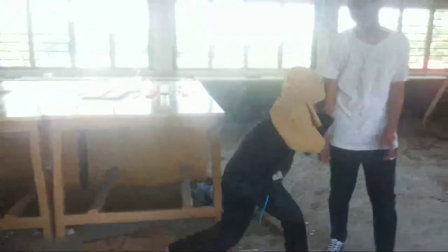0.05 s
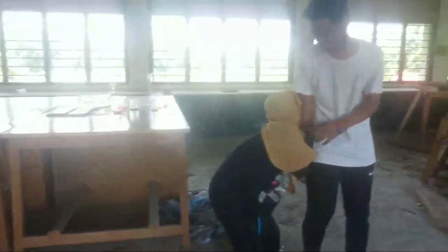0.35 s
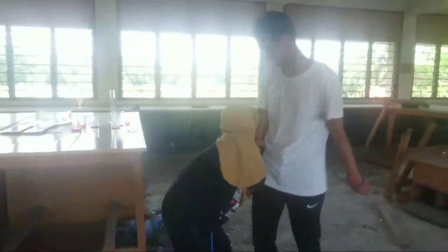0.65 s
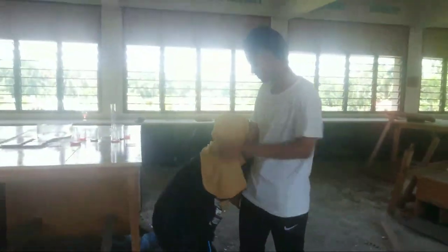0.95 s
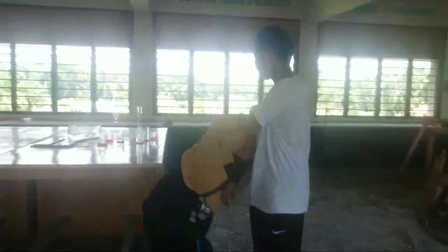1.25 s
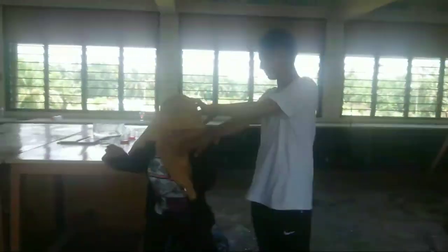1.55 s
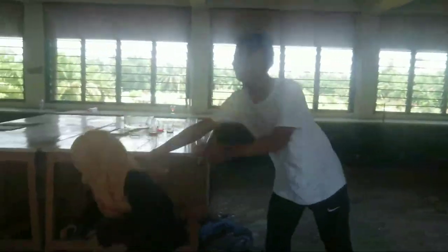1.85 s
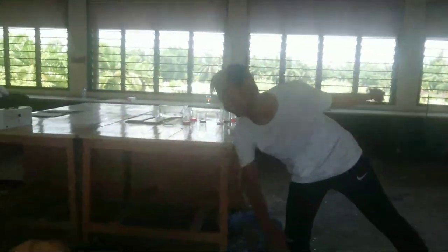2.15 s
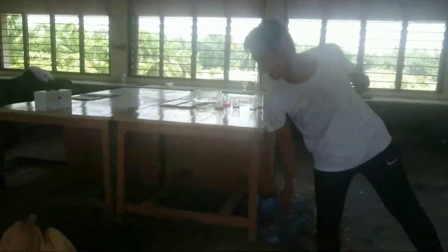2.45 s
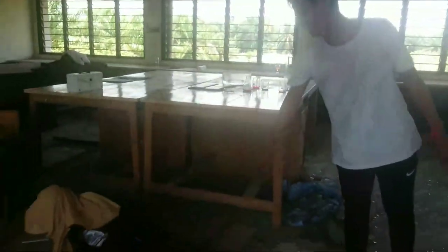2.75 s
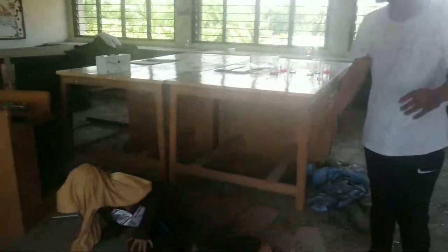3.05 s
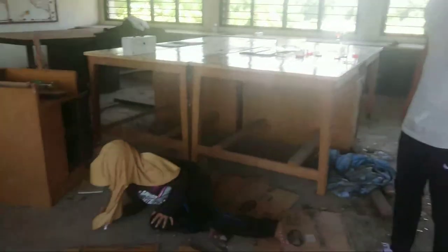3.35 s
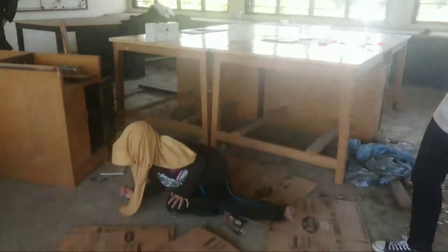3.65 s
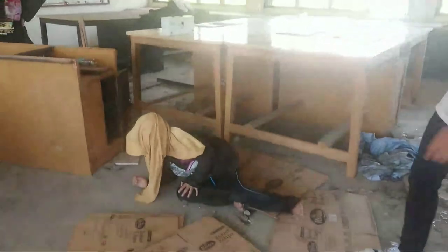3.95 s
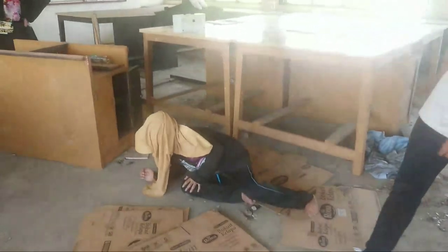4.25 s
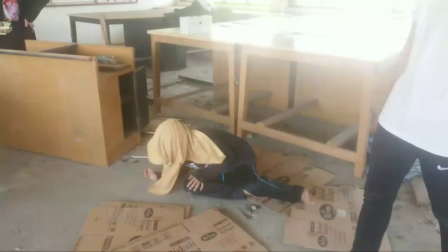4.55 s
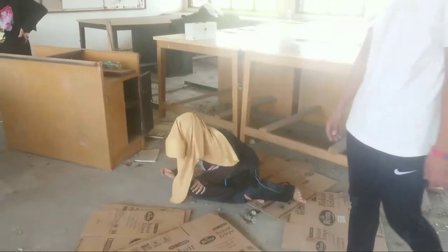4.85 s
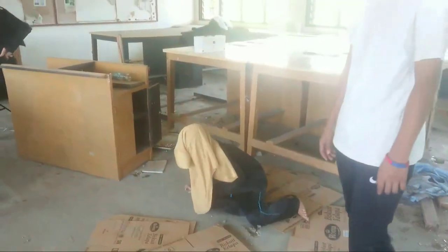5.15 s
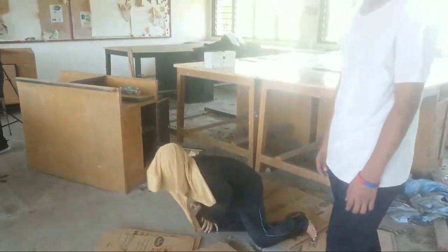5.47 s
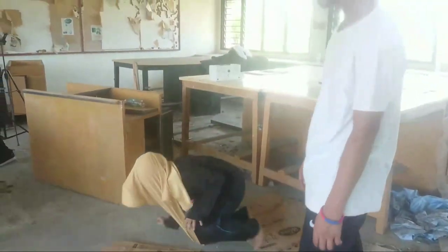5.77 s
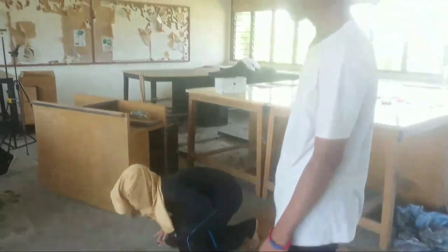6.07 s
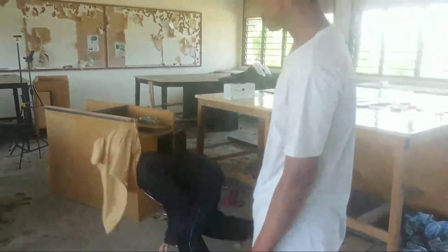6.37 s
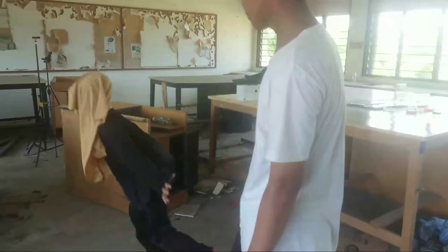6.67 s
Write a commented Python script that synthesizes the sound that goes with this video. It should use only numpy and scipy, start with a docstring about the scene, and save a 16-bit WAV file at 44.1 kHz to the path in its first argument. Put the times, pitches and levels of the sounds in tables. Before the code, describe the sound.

Irregular scuffing, cardboard crackles and dull thumps of two people scuffling on a hard floor, ringing in a bare room.

```python
"""Two people scuffle in a bare classroom, on gritty concrete covered with flattened cardboard boxes.
From the start, over a low rumble, soles and clothes drag; the cardboard snaps and knocks.
Feet and knees thump down, hardest at 2.2 s. A sliding contact squeaks at 2.6-3 s; more landings follow.
A lull from 3.5 s is broken by a scrape at 4.3 s; scuffing builds again to landings at 6.1 and 6.8 s.
The hard room rings on after every move."""
import sys
import numpy as np
from scipy import signal
from scipy.fft import rfft, irfft, next_fast_len
from scipy.io import wavfile
from scipy.ndimage import uniform_filter1d, map_coordinates

SR = 44100
rng = np.random.default_rng(int(sys.argv[2]) if len(sys.argv) > 2 else 0)


def persist_wave(psi):
    """Save psi, clipped to +-1, as 16-bit WAV."""
    counts = np.round(np.clip(psi, -1, 1) * 32767).astype(np.int16)
    wavfile.write(sys.argv[1], SR, np.atleast_2d(counts).T)


N = 300321

# Levels are relative, ahead of each layer's gain.
# sole and cloth strokes: t/s, length/s, scrape/dB, grit/dB, share on cardboard (clipped to 0-1)
STROKES = [(-0.02, 0.09, -31, -33, .5), (0.106, 0.083, -38.5, -36, 0.5), (0.22, .04, -42, -33, -3),
           (0.318, 0.068, -29, -19.5, -0.16), (0.423, 0.036, -28.5, -21, 1.7),
           (0.446, 0.01, -19, -22.5, -0.1), (0.57, .14, -41, -47.5, -1.9), (0.81, 0.082, -45, -43.5, 0.1),
           (0.968, 0.051, -30.5, -30.5, 0), (1.211, 0.016, -24.5, -31, 0.36),
           (1.263, 0.068, -40, -33.5, 0.7), (1.502, 0.051, -23, -23.5, .1), (1.539, 0.017, -17, -21.5, 0),
           (1.58, .09, -39, -40, 2.5), (1.666, 0.037, -23, -23, 0.3), (1.839, 0.14, -30.5, -29.5, 0.2),
           (2.015, 0.041, -25, -21.5, 0.4), (2.124, 0.051, -29, -26, 0.4), (2.19, 0.17, -34, -30.5, -0.1),
           (2.374, 0.12, -25.5, -29, 0.16), (2.494, .11, -26.5, -31.5, 0.4), (2.635, 0.28, -46.5, -38.5, 0),
           (2.903, 0.22, -44, -38.5, 0.4), (3.266, 0.02, -31.5, -33.5, -0.6), (4.01, 0.11, -59, -57, 20),
           (4.113, .11, -44.5, -39, -1), (4.27, 0.13, -26, -26, -0.32), (4.35, 0.095, -30.5, -36, 0.2),
           (4.595, .22, -62, -46.5, 0.5), (4.907, 0.17, -57.5, -45, .1), (5.188, 0.16, -55, -46, 0.7),
           (5.381, 0.04, -40.5, -45.5, 0.4), (5.595, 0.31, -46.5, -47, 0.8), (5.788, 0.2, -38.5, -39, 0.38),
           (6.047, 0.059, -32, -30.5, 0.5), (6.255, 0.21, -37, -34, 0.9),
           (6.402, 0.091, -29.5, -33.5, 0.13), (6.497, 0.19, -36.5, -38.5, 0.3),
           (6.713, 0.062, -32, -30, 1.8)]
# weight rolling over the sheets: t/s, length/s, drone/dB
ROLLS = [(-0.03, 0.11, -39), (1.603, 0.17, -39.5), (2.021, 0.047, -33), (4.325, .12, -45),
         (5.775, 0.32, -48.5), (6.392, 0.29, -43)]
# spectra of concrete rasp, hollow cardboard, grit hiss, sheet drone: f/Hz, level/dB
RASP_SPECTRUM = [(240, -24), (450, -22.5), (700, -16), (950, -5.5), (1200, -2.5), (1550, -4.5),
                 (2150, -0.5), (2600, -4), (3400, -5.5), (8000, -2.5), (12000, -50.5)]
SHEET_SPECTRUM = [(300, -18), (600, -19.5), (710, 1.5), (780, -9), (855, 2.5), (950, -15), (1055, -1.5),
                  (1140, -20), (1240, -9), (1500, -11), (4000, -31.5)]
GRIT_SPECTRUM = [(1200, -22), (2200, 14), (3300, 0.5), (5200, -0.5), (6100, -2.5), (7300, -1), (10300, -8),
                 (13000, -10.5), (15800, -15.5)]
DRONE_SPECTRUM = [(70, -17), (125, -1.5), (180, -14.5), (236, 9.5), (310, -9.5), (410, 4.5), (540, 1),
                  (680, -5.5), (1100, -36)]
# background spectra: f/Hz, level/dB
RUMBLE_SPECTRUM = [(35, -15), (52, 6), (85, 5), (130, -4.5), (220, -13.5), (500, -29)]
AIR_SPECTRUM = [(100, -4), (400, 15), (1500, -13), (6000, -22), (11000, -9), (14000, -26)]
# rumble envelope: t/s, level/dB
RUMBLE_LEVEL = [(0.0, -42.5), (0.42, -47.5), (1.61, -50.5), (2.39, -49), (3.02, -55), (3.47, -57),
                (4.14, -58.5), (6.07, -52.5), (6.81, -58)]
# cardboard and grit snapping: t/s, level/dB, body offset/dB, f/Hz
SNAPS = [(0.0864, -16, -13, 4930), (0.1638, -11.5, -20, 5050), (0.3184, -12.5, -17, 5400),
         (0.3471, -5, -31, 5540), (0.455, -4, -32, 5040), (0.465, -21, -20, 5000), (1.227, -13, -18, 2280),
         (1.3022, -24, -11, 2380), (1.4702, -29.5, 2.5, 2420), (1.525, -12, 0.5, 2100),
         (1.534, -17, 5, 2180), (2.0318, -8.5, -28, 6960), (2.0452, -13.5, -14, 3130),
         (3.2715, -23.5, -1.5, 4200), (3.2964, -18.5, -4, 2200), (3.312, -27.5, -3, 2270),
         (3.485, -32.5, -42, 5970), (4.159, -23.5, -19, 2240), (4.2693, -29, 6, 2280),
         (4.3295, -15.5, 1.5, 2280), (5.3193, -37, 2.5, 2080), (5.3868, -35, -15, 2360),
         (5.589, -37.5, -15, 2640), (6.059, -12.5, -18, 6900), (6.0905, -22.5, -16, 2450),
         (6.7337, -15, -11, 6270)]
# knocks on a buckled sheet: t/s, level/dB, f/Hz
KNOCKS = [(0.2084, -14.5, 864), (0.898, -32, 810), (1.217, -26, 1130), (1.226, -23, 973),
          (1.562, -11, 1060), (3.271, -27, 930), (5.3865, -34, 2210)]
# feet, hands and knees landing: t/s, level/dB, thud offset/dB, slap f/Hz, thud f/Hz
LANDINGS = [(0.458, -27, -12, 690, 204), (1.227, -28, -8, 1020, 240), (1.655, -31.5, 0.5, 550, 161),
            (2.164, -14.5, -4, 1050, 393), (2.254, -23.5, -2.5, 720, 470), (2.282, -25, -0.5, 650, 230),
            (3.294, -26, 1, 1040, 426), (3.31, -28.5, -0.5, 1120, 486), (3.342, -39, 4.5, 850, 437),
            (5.387, -39.5, -3.5, 880, 354), (6.091, -20.5, -8.5, 745, 247), (6.759, -16.5, -7.5, 800, 272),
            (6.777, -27, -12, 930, 240)]
# impact spectra: multiple of the event's f, level/dB
CRACK_SPECTRUM = [(.15, -15), (.6, -13), (1, 7.5), (1.4, -1), (2.5, -2), (6, -38)]
SLAP_SPECTRUM = [(.2, -17), (.55, -19.5), (1, 5.5), (1.35, -5.5), (1.9, -13), (3.2, -13), (9, -35.5),
                 (17, -33)]
THUD_SPECTRUM = [(.12, 8), (.3, -16), (.65, 0.5), (1.2, 5), (1.8, 0.5), (3.5, -24), (12, -48)]
# stick-slip squeaks and groans: centre t/s, length/s, f/Hz, waver/Hz, level/dB
SQUEAKS = [(2.58, .09, 7480, 32, -41), (2.58, .14, 858, 22, -41), (2.674, .047, 6990, 22, -36),
           (2.72, .22, 7480, 24, -50), (2.73, .12, 6990, 20, -43), (2.94, .05, 7000, 40, -46),
           (4.44, .24, 700, 16, -47), (5.738, .06, 309, 12, -53)]
# mover's bearing: t/s, left channel lead/s
BEARING = [(0, .00003), (1.2, .00011), (2.2, .00009), (3.2, 0), (4.3, -.00008), (5.2, .00004),
           (6.8, .00007)]
# room decay: f/Hz, t60/s
ROOM_T60 = [(100, 3.2), (400, 1.1), (1000, 1.04), (2500, 0.88), (6000, 0.73), (14000, 0.48)]
# diffuse field: f/Hz, left-right correlation
COHERENCE = [(100, 1), (300, 0.96), (600, 0.73), (1200, 0.057), (2500, 0), (12000, 0.16)]
# channel balance: f/Hz, left minus right/dB
BALANCE = [(60, 7), (110, 9.5), (200, 6.5), (380, 10.5), (700, 4.5), (1290, 4.5), (2380, 2.0), (4400, 1.0),
           (8120, 5), (15000, 2)]


def amp(db):
    return 10 ** (np.asarray(db) / 20)


def unit(x):
    return x / np.sqrt(np.mean(x ** 2) + 1e-20)


def along(points, hz):
    """Interpolate (f/Hz, value) points on a log axis."""
    f, values = np.transpose(points)
    return np.interp(np.log(hz + 1), np.log(f + 1), values)


def curve(points):
    """Interpolate (t/s, value) points per sample."""
    times, values = np.transpose(points)
    return np.interp(np.arange(N) / SR, times, values)


def wobble(rate_hz):
    """Smooth random curve."""
    knots = rng.standard_normal(int(N * rate_hz / SR) + 4)
    return map_coordinates(knots, [np.arange(N) * rate_hz / SR])


def filtered(x, response):
    """Zero-phase filter, gain response(hz)."""
    n = x.shape[-1]
    size = next_fast_len(n + SR // 4)
    return irfft(rfft(x, size) * response(np.fft.rfftfreq(size, 1 / SR)), size)[..., :n]


def coloured(x, spectrum, scale=1, size=4096):
    """Minimum-phase filter of unit energy; scale multiplies the spectrum's frequencies."""
    gain = amp(along(np.multiply(spectrum, [scale, 1]), np.fft.rfftfreq(size, 1 / SR)))
    cepstrum = irfft(np.log(gain))
    cepstrum[1:size // 2] *= 2
    cepstrum[size // 2 + 1:] = 0
    impulse = irfft(np.exp(rfft(cepstrum)))
    return signal.fftconvolve(x, impulse / np.linalg.norm(impulse))[:len(x)]


def add(track, start_s, sound):
    start = max(round(start_s * SR), 0)
    track[start:start + len(sound)] += sound[:max(N - start, 0)]


def diffuse(pair):
    """Two unrelated signals as a field: alike in the bass, nearly unrelated in the treble."""
    angle = lambda hz: np.arccos(np.clip(along(COHERENCE, hz), -1, 1)) / 2
    mid, side = filtered(pair, lambda hz: np.array([np.cos(angle(hz)), np.sin(angle(hz))]))
    return np.array([mid + side, mid - side])


def stroke(start_s, length_s, sag_db=4.5, release_db_per_s=332):
    """Power of one sliding contact: it bites, eases as it travels, lifts."""
    t = np.arange(N) / SR - start_s
    rise_s = 0.038 * (length_s / 0.13) ** 0.53  # longer strokes build more slowly
    bite = np.clip(t / rise_s, 0, 1)
    eased_db = sag_db * np.clip(t / length_s, 0, 1)
    lifted_db = release_db_per_s * np.maximum(t - length_s, 0)
    return (bite * amp(-eased_db - lifted_db)) ** 2


def sliding(cloth_db=-60, cloth_hiss_db=-66.5):
    """Concrete, cardboard and grit envelopes: strokes over the constant rub of clothes."""
    power = np.outer([amp(cloth_db) ** 2, 0, amp(cloth_hiss_db) ** 2], np.ones(N))
    for start_s, length_s, scrape_db, grit_db, share in STROKES:
        on_sheet = np.clip(share, 0, 1)
        mix = [amp(scrape_db) ** 2 * (1 - on_sheet), amp(scrape_db) ** 2 * on_sheet, amp(grit_db) ** 2]
        power += np.outer(mix, stroke(start_s, length_s))
    return np.sqrt(power)


def slips(rate_hz, spread_db, clump_db, clump_hz):
    """Tiny uneven slips, bunched where the surface catches."""
    hits = rng.random(N) < rate_hz / SR
    sizes = amp(spread_db * rng.standard_normal(N) + clump_db * wobble(clump_hz))
    return unit(hits * sizes * rng.standard_normal(N))


def shifting(x, depth_db=1.8, size=1024):
    """Surface resonances shift as the contact travels."""
    spectra = signal.stft(x, nperseg=size)[2]
    drift = uniform_filter1d(rng.standard_normal(spectra.shape), size=2, axis=0)
    drift = uniform_filter1d(drift, size=12, axis=1)
    return unit(signal.istft(spectra * amp(depth_db * unit(drift)), nperseg=size)[1][:N])


def flexing(scrape_envelope, stir_db=-29.5, shudder_db=-21.5, decay_db_per_s=52.5):
    """Sheet drone envelope: stirred by strokes, pressed by rolling weight, shaken by landings."""
    t = np.arange(N) / SR
    stirred = (amp(stir_db) * scrape_envelope) ** 2
    rolled = sum(amp(db) ** 2 * stroke(start_s, length_s) for start_s, length_s, db in ROLLS)
    shaken = sum((t > start_s) * amp(db + shudder_db - decay_db_per_s * np.abs(t - start_s)) ** 2
                 for start_s, db, *_ in LANDINGS)
    return np.sqrt(stirred + rolled + shaken)


def scuffs(drone_db=-2, split_hz=3600):
    """Soles rasp on concrete, rub hollow on cardboard; grit and cloth hiss above, sheets drone below."""
    on_concrete, on_sheet, on_grit = sliding()
    low = lambda hz: 1 / np.sqrt(1 + (hz / split_hz) ** 8)
    high = lambda hz: np.sqrt(1 - low(hz) ** 2)
    rasp = coloured(slips(rate_hz=7000, spread_db=3, clump_db=0.23, clump_hz=130), RASP_SPECTRUM)
    hollow = coloured(slips(rate_hz=3600, spread_db=3, clump_db=4, clump_hz=86), SHEET_SPECTRUM)
    grit = coloured(slips(rate_hz=14000, spread_db=2.5, clump_db=1, clump_hz=150), GRIT_SPECTRUM)
    drone = coloured(slips(rate_hz=1300, spread_db=1.5, clump_db=2, clump_hz=60), DRONE_SPECTRUM)
    return (on_concrete * shifting(filtered(rasp, low))
            + on_sheet * shifting(filtered(hollow, low))
            + on_grit * shifting(filtered(grit, high))
            + amp(drone_db) * flexing(np.hypot(on_concrete, on_sheet)) * unit(drone))


def background(rumble_db=-1, air_db=-65):
    """Restless low rumble and a faint wash of air."""
    def noise(spectrum):
        field = diffuse(rng.standard_normal((2, N)))
        return unit(filtered(field, lambda hz: amp(along(spectrum, hz))))

    rumble = amp(curve(RUMBLE_LEVEL) + rumble_db) * noise(RUMBLE_SPECTRUM)
    return rumble + amp(air_db) * noise(AIR_SPECTRUM)


def contact(t60_s, crush):
    """One sharp push, then a dying crush of fibres; unit energy."""
    t = np.arange(SR // 4) / SR
    burst = rng.standard_normal(len(t)) * amp(-60 * t / t60_s)
    burst *= crush / np.linalg.norm(burst)
    burst[0] += 1
    return burst / np.linalg.norm(burst)


def snaps(top_db=16, body_db=17):
    """Creases and grains give way in short dry cracks."""
    out = np.zeros(N)
    for start_s, db, offset_db, hz in SNAPS:
        crack = contact(t60_s=0.024, crush=2.5)
        add(out, start_s, amp(db + top_db) * coloured(crack, CRACK_SPECTRUM, hz))
        add(out, start_s, amp(db + offset_db + body_db) * coloured(crack, RASP_SPECTRUM))
    return out


def knocks(t60_s=0.022, attack_s=0.00028, mode_ratio=1.06, upper_db=-5):
    """A sheet lifted off the floor rings briefly in two close modes."""
    t, out = np.arange(SR // 5) / SR, np.zeros(N)
    envelope = amp(-60 * t / t60_s) * (1 - np.exp(-t / attack_s))
    for start_s, db, hz in KNOCKS:
        phase = 2 * np.pi * hz * t
        ring = np.sin(phase) + amp(upper_db) * np.sin(mode_ratio * phase)
        add(out, start_s, amp(db) * envelope * ring)
    return out


def landings(slap_db=23, thud_db=26):
    """A landing slaps the sheet flat; the weight behind it thuds into the floor."""
    out = np.zeros(N)
    for start_s, db, offset_db, slap_hz, thud_hz in LANDINGS:
        slap = coloured(contact(t60_s=0.054, crush=0.47), SLAP_SPECTRUM, slap_hz)
        thud = coloured(contact(t60_s=0.32, crush=0.84), THUD_SPECTRUM, thud_hz)
        add(out, start_s, amp(db + slap_db) * slap + amp(db + offset_db + thud_db) * thud)
    return out


def squeaks(rough_db=3):
    """Stick-slip: a sliding contact briefly locks into a wavering, scratchy tone."""
    t, out = np.arange(N) / SR, np.zeros(N)
    waver = wobble(rate_hz=260)
    grip = unit(amp(rough_db * wobble(rate_hz=110)))
    for centre_s, length_s, hz, waver_hz, db in SQUEAKS:
        phase = 2 * np.pi * np.cumsum(hz + waver_hz * waver) / SR
        envelope = np.exp(-(2 * (t - centre_s) / length_s) ** 2)
        out += amp(db) * envelope * np.sin(phase)
    return grip * out


def direct(x):
    """The straight path reaches the nearer side first."""
    shift = curve(BEARING) * SR / 2
    return np.array([map_coordinates(x, [np.arange(N) + side * shift], order=5) for side in (1, -1)])


def room(x, early_db=-6, early_t60_s=0.047, tail_db=-4, size=512):
    """Tables answer at once, bare walls ring on; moving sources leave the echo phases random."""
    hop = size // 4
    framing = dict(fs=SR, nperseg=size, noverlap=size - hop)
    hz, t, spectra = signal.stft(x, **framing)
    delay_s = t[t < 1]

    def decay(db, t60_s):
        energy = (delay_s > 0) * amp(-60 * delay_s / t60_s) ** 2
        return amp(db) ** 2 * energy / energy.sum(axis=-1, keepdims=True)

    response = decay(tail_db, along(ROOM_T60, hz)[:, None]) + decay(early_db, early_t60_s)
    power = np.abs(signal.fftconvolve(np.abs(spectra) ** 2, response, axes=1)[:, :len(t)])
    noise = signal.stft(rng.standard_normal((2, N)), **framing)[2]
    field = noise * np.sqrt(power / np.mean(np.abs(noise) ** 2))
    echo = signal.istft(field, **framing)[1]
    return diffuse(np.pad(echo, ((0, 0), (hop, 0)))[:, :N])


def scene(direct_db=-6.5, thump_send_db=-1.5, snap_send_db=-5):
    """Scuffs and impacts, direct and through the room, plus dry squeaks and background."""
    rubs = scuffs()
    thumps = landings() + knocks()
    cracks = snaps()
    echo = room(rubs + amp(thump_send_db) * thumps + amp(snap_send_db) * cracks)
    return amp(direct_db) * direct(rubs + thumps + cracks) + echo + squeaks() + background()


def record(dry, low_hz=42, top_hz=15750):
    """Bass roll-off, hard treble limit, left side louder."""
    sides = np.array([[1], [-1]])
    band = lambda hz: (hz / low_hz) ** 4 / np.sqrt(1 + (hz / low_hz) ** 8) * (hz < top_hz)
    return filtered(dry, lambda hz: amp(sides * along(BALANCE, hz) / 2) * band(hz))


dry = scene()
out = record(dry)
persist_wave(out)
```